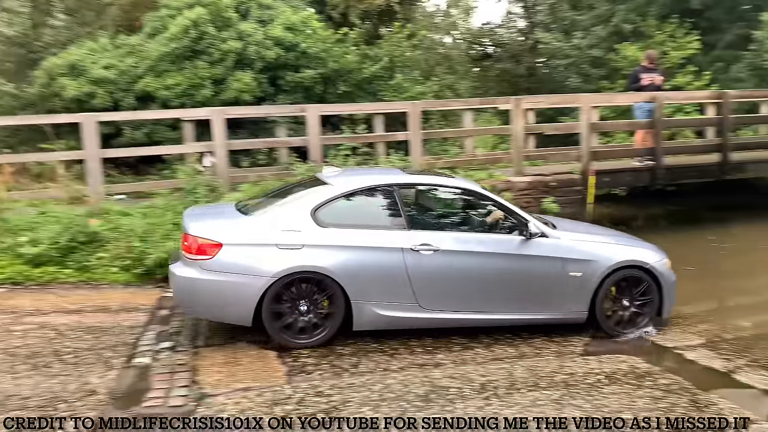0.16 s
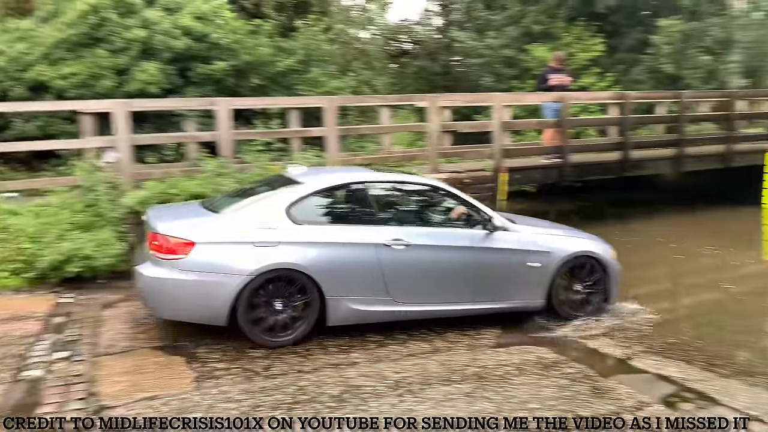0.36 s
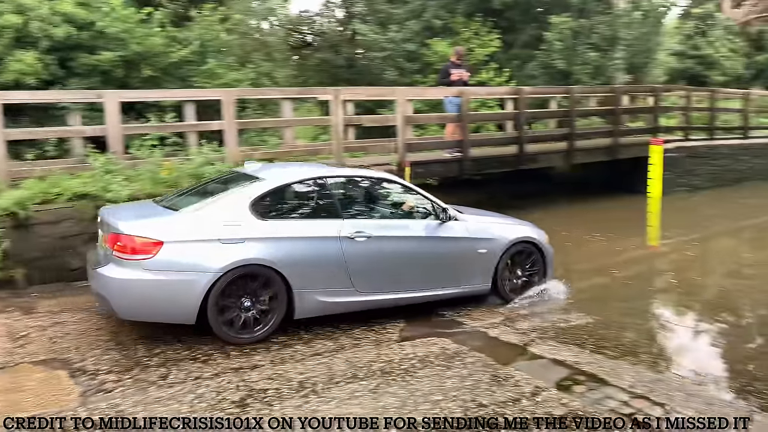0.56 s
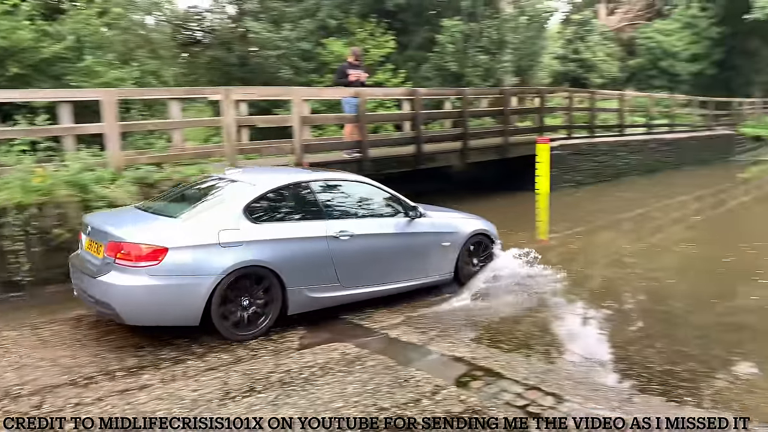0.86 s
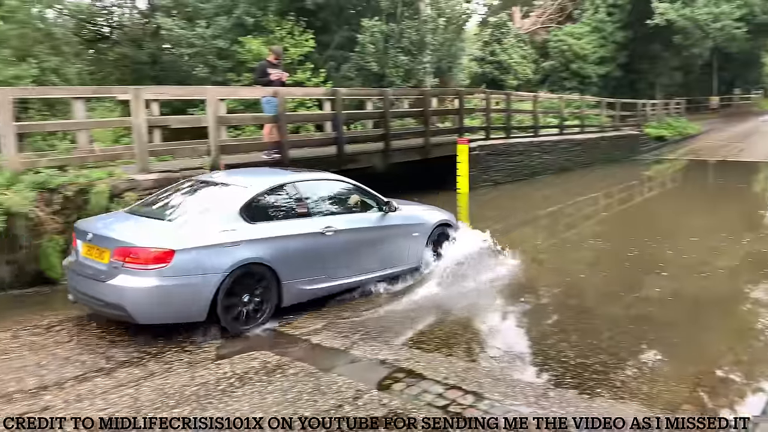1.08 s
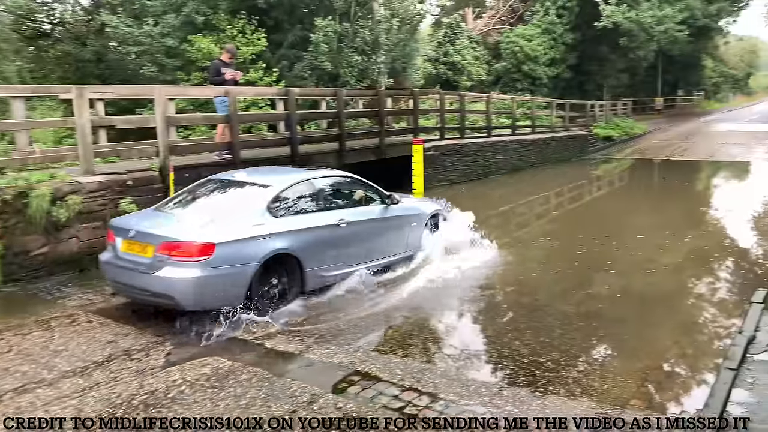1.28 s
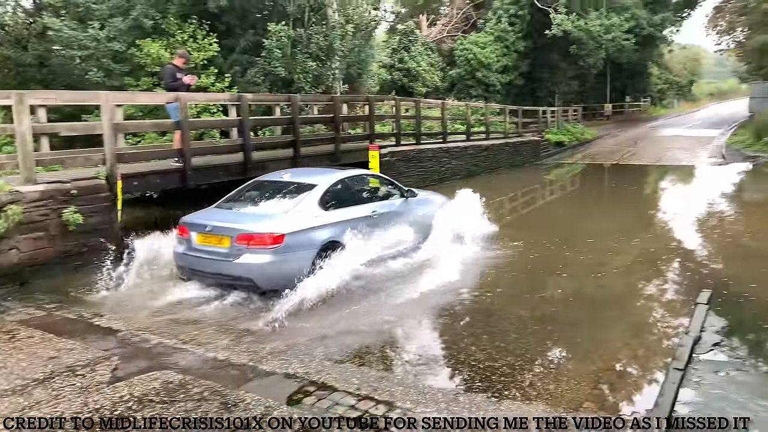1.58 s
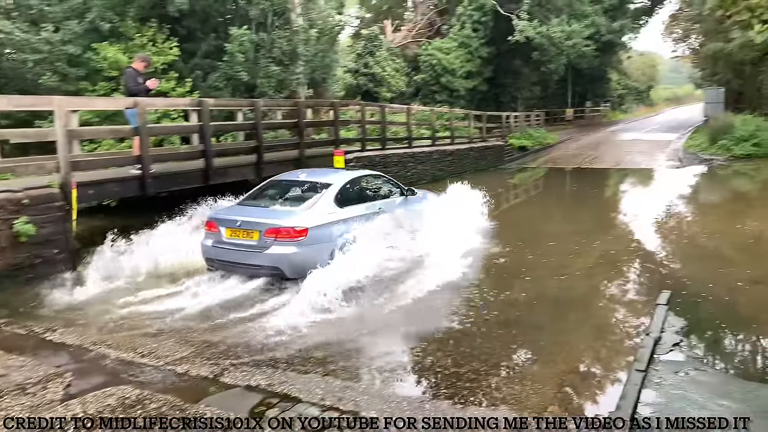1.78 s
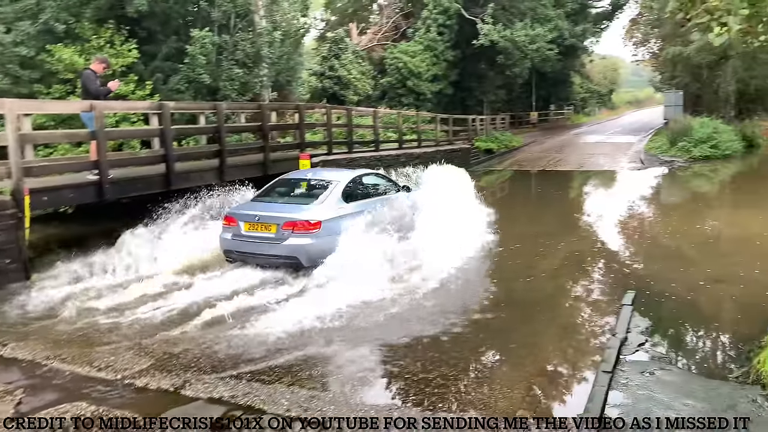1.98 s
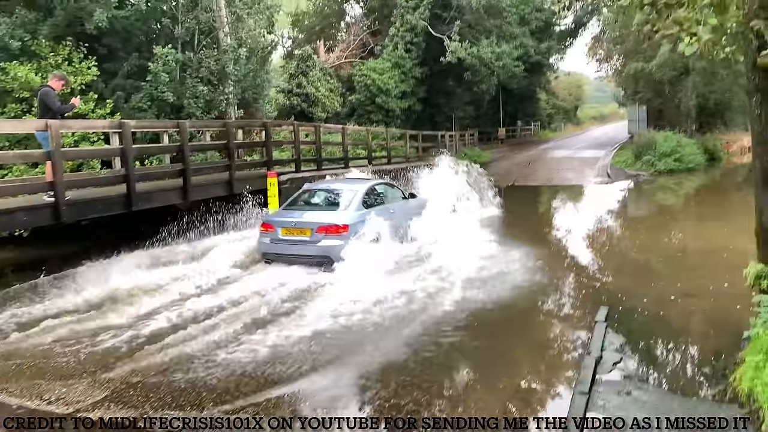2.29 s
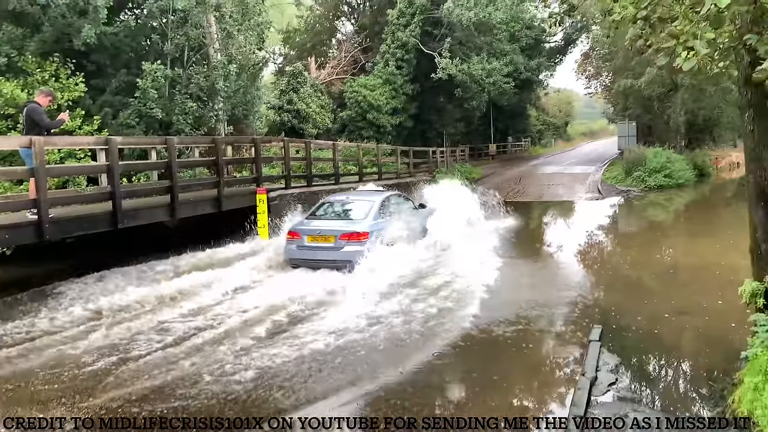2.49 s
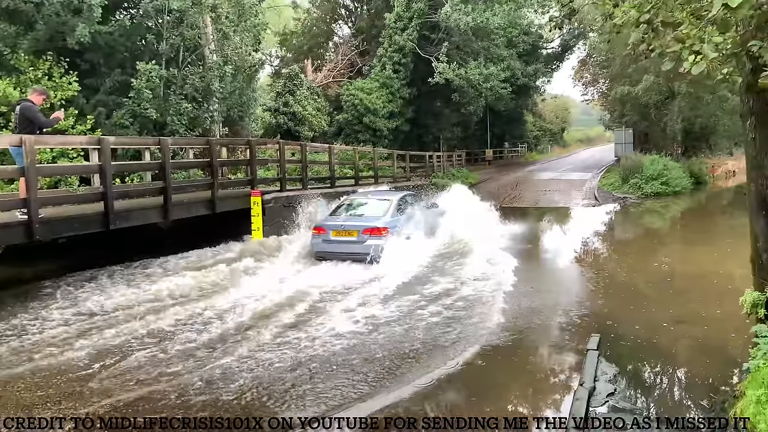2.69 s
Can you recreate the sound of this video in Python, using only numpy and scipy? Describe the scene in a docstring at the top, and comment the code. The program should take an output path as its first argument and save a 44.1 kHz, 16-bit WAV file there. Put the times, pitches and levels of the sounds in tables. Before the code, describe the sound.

A car rolls over wet stones with sharp tyre clacks and small puddle slaps, then drives into a flooded ford; sloshing swells into roaring spray, low booms and gulps, heard outdoors in stereo from the bank.

```python
"""Tyres clack over stones and slap through puddles above an engine's low burble.
Then a car ploughs from a wet ramp into a flooded ford: the bow wave sloshes, rumbles and hisses with spray.
Water is built from patchy noise and rising bubble tones, the underbody from thuds, gulps and a churning boom;
the tyres ring a wet wheel arch, and the engine is a stack of wavering orders of its firing rate."""
import sys
import numpy as np
from scipy import signal
from scipy.fft import rfft, irfft, next_fast_len
from scipy.io import wavfile
from scipy.ndimage import uniform_filter1d, map_coordinates

SR = 44100
rng = np.random.default_rng(int(sys.argv[2]) if len(sys.argv) > 2 else 0)


def int16_out(signal):
    """Quantize to a 16-bit WAV file."""
    q = np.round(np.clip(np.atleast_2d(signal).T, -1, 1) * 32767)
    wavfile.write(sys.argv[1], SR, q.astype(np.int16))


N = 125685  # samples, 2.85 s
FULL_FLOW_DB = -31.5  # slosh level at which rumble and splatter have their nominal levels


def amp(db):
    """Decibels to gain."""
    return 10 ** (np.asarray(db) / 20)


def unit(x):
    """Scale to rms 1."""
    return x / np.sqrt(np.mean(x ** 2) + 1e-20)


def centred(x):
    """Put a mono sound in the shared half of a (shared, diffuse) pair."""
    return np.array([x, np.zeros(N)])


def along(points, hz):
    """Read (f/Hz, value) points on a log frequency axis."""
    f, v = np.transpose(points)
    return np.interp(np.log(hz + 1), np.log(f + 1), v)


def curves(rows):
    """One value per sample for each column after the time."""
    s, *cols = np.transpose(rows)
    return [np.interp(np.arange(N) / SR, s, c) for c in cols]


def wobble(rate):
    """A smooth random curve, rate knots a second."""
    knots = rng.standard_normal(2048)
    return map_coordinates(knots, [np.arange(N) * rate / SR], mode="wrap")


def filtered(x, response):
    """Multiply the spectrum of x by a response of frequency."""
    m = next_fast_len(N + SR // 2)
    return irfft(rfft(x, m) * response(np.fft.rfftfreq(m, 1 / SR)), m)[..., :N]


def coloured(x, spectrum):
    """Shape x with a (f/Hz, level/dB) colour, at rms 1."""
    return unit(filtered(x, lambda hz: amp(along(spectrum, hz))))


def band(f, hz, q):
    """One resonance at hz, of sharpness q."""
    return 1j * f * hz / (q * (hz * hz - f * f) + 1j * f * hz)


def rush(patchy_db):
    """Two white noises sharing random gain patches in time and frequency, like ragged running water."""
    z = signal.stft(rng.standard_normal((2, N)), nperseg=512)[2]
    field = rng.standard_normal(z.shape[1:])
    field = uniform_filter1d(field, size=7, axis=0)
    field = uniform_filter1d(field, size=8, axis=1)
    return unit(signal.istft(z * amp(patchy_db * unit(field)), nperseg=512)[1][:, :N])


def bubbles(per_s, centre_hz, spread, cycles, scatter_db, rise, size):
    """A stream of short damped tones of random pitch and strength, each gliding upward."""
    when, pitch, strength = rng.random((int(per_s * N / SR), 3)).T
    start = (when * N).astype(int)
    detune = np.exp(spread * np.log((pitch + .01) / (1.01 - pitch)) / 2)
    hz = np.broadcast_to(centre_hz, N)[start] * detune
    turns = np.minimum(hz, SR / 3)[:, None] * np.arange(size) / SR
    age = np.minimum(turns / cycles, 2)  # 1 where the tone has died by 60 dB
    decay = np.exp(-np.log(1000) * age)
    onset = 1 - np.exp(-2 * turns)
    tones = np.sin(2 * np.pi * turns * (1 + rise * age / 2)) * decay * onset
    gain = amp(-scatter_db * np.log(strength + .01)) * np.sqrt(hz)
    places = start[:, None] + np.arange(size)
    return unit(np.bincount(places.ravel(), (tones * gain[:, None]).ravel(), N + size)[:N])


def bubble_pair(*args, **kwargs):
    """Two independent bubble streams, for width."""
    return np.array([bubbles(*args, **kwargs) for _ in range(2)])


# Bow wave [t/s, slosh level/dB before the mix trim, spray level/dB]
BOW_WAVE = [(0, -37, -50), (.16, -39, -44.5), (.33, -43, -48.5), (.5, -41, -42.5), (.68, -37, -42.5),
            (.85, -35.5, -41), (1.05, -30.5, -36.5), (1.15, -29.5, -32.5), (1.3, -31.5, -31),
            (1.45, -28, -30), (1.56, -28, -32), (1.78, -30.5, -33), (2.05, -29, -30), (2.3, -29.5, -29.5),
            (2.55, -32, -32), (2.85, -32, -33.5)]
# Colour of the slosh [f/Hz, level/dB]
SLOSH_COLOUR = [(60, -26), (200, -26), (400, 5), (700, 2), (1050, 2.5), (1450, 0.5), (1750, -2), (2400, -3),
                (3200, -7.5), (6000, -47)]
# Colour of the low rumble [f/Hz, level/dB]
RUMBLE_COLOUR = [(20, -26), (35, -12), (50, 1), (70, -5.5), (120, -6), (250, -7.5), (600, -32.5)]
RUMBLE_DB, RUMBLE_FOLLOWS = -30.5, 0.77  # level at full flow; dB gained per dB of slosh


def bow_wave():
    """The pushed water rumbles and sloshes as patchy noise; trapped bubbles gurgle in it."""
    db, _ = curves(BOW_WAVE)
    gurgle = bubble_pair(1300, 1099.5, spread=0.42, cycles=27, scatter_db=0, rise=0.44, size=1400)
    slosh = unit(coloured(rush(patchy_db=1.5), SLOSH_COLOUR) + gurgle)
    rumble_db = RUMBLE_DB + RUMBLE_FOLLOWS * (db - FULL_FLOW_DB)
    rumble = amp(rumble_db) * coloured(rush(patchy_db=0.5), RUMBLE_COLOUR)
    return amp(db - 1.5 + 0.41 * wobble(35.3)) * slosh + rumble  # slosh trimmed 1.5 dB


# Colour of the spray, also of the tyres' squirts [f/Hz, level/dB]
SPRAY_COLOUR = [(600, -9), (1500, -12), (2300, 3.5), (3100, -2.5), (4100, 1.5), (5300, -4), (6200, -.5),
                (6900, -2.5), (7800, -2.5), (8150, 5), (9000, -0.5), (10500, 0.5), (11800, -6.5),
                (13200, 0.5), (14700, -20.5)]
MIST_HZ = 7100  # the mist is the hiss above this
MIST_REFERENCE_DB = -23.5  # spray level at which mist would be unchanged; softer spray has less mist
SPRAY_BRIGHTENS = 0.035  # extra dB of mist per dB of spray


def spray():
    """Sheets of water tear into hiss and rain back as droplets; the harder the throw, the more fine mist."""
    _, db = curves(BOW_WAVE)
    drops = bubble_pair(2200, 5470, spread=0.61, cycles=3.9, scatter_db=-2.5, rise=.1, size=160)
    hiss = coloured(rush(patchy_db=1.5) + amp(-6) * drops, SPRAY_COLOUR)
    mist = filtered(hiss, lambda hz: hz ** 4 / (hz ** 4 + MIST_HZ ** 4))
    mist_gain = amp(SPRAY_BRIGHTENS * (db - MIST_REFERENCE_DB))
    return amp(db + 0.7 * wobble(45.1)) * (hiss - mist + mist_gain * mist)


# Waves thudding against the underbody [t/s, level/dB before attack and decay, f/Hz]
UNDERBODY_THUDS = [(.295, -29.5, 71), (.72, -25, 57.4), (1.115, -22, 80), (1.53, -17.5, 72.2),
                   (1.745, -20, 74), (1.92, -17, 67.06), (2.313, -13, 68), (2.375, -7, 86.3),
                   (2.533, -15, 72.93), (2.699, -13, 88.9), (2.82, -16.5, 78)]
THUD_ATTACK_S, THUD_DECAY_S = 0.0036, 0.014


def thuds():
    """Each wave gives the floor pan a soft, quickly damped blow: a low sine with a rounded onset."""
    t, out = np.arange(N) / SR, np.zeros(N)
    for s, db, hz in UNDERBODY_THUDS:
        age = np.maximum(t - s, 0)
        shape = (1 - np.exp(-age / THUD_ATTACK_S)) * np.exp(-age / THUD_DECAY_S)
        out += amp(db) * np.sqrt(2) * np.sin(2 * np.pi * hz * age) * shape
    return centred(out)


# Water churning under the body [t/s, level/dB before the mix trim, air pocket f/Hz]
UNDERBODY_CHURN = [(0, -45.5, 150), (.35, -36.5, 156), (.65, -47, 185), (.82, -33, 178.2), (1.03, -44, 188),
                   (1.15, -25.5, 193.6), (1.36, -33.5, 213), (1.6, -24.5, 174), (1.95, -27.5, 162),
                   (2.2, -25, 155), (2.33, -21.5, 150), (2.42, -22, 104), (2.6, -21.5, 102),
                   (2.85, -27.5, 92.2)]


def churn():
    """Big air pockets boom under the car as dense, short low tones that follow a moving pitch."""
    db, hz = curves(UNDERBODY_CHURN)
    boom = bubble_pair(560, hz, spread=0.35, cycles=6.6, scatter_db=0.0, rise=0.04, size=3000)
    return amp(db - 1.0) * boom  # trimmed 1 dB


# The largest air pockets gulping under the car [t/s, peak level/dB, starting f/Hz]
AIR_GULPS = [(1.10, -29, 159.3), (1.165, -26.5, 234.6), (1.499, -28.5, 194.5), (1.595, -25.5, 237),
             (1.675, -27, 175), (2.066, -26, 165), (2.12, -19.5, 135), (2.195, -27, 169), (2.285, -20, 127),
             (2.305, -20, 180), (2.535, -26.5, 224)]
GULP_SWELL_S, GULP_RISE_PER_S = 0.015, 0.85  # time to peak; fraction of the pitch gained per second


def gulps():
    """A big pocket swells, rings and rises in pitch as it nears the surface."""
    t, out = np.arange(N) / SR, np.zeros(N)
    for s, db, hz in AIR_GULPS:
        age = np.maximum(t - s, 0)
        shape = age / GULP_SWELL_S * np.exp(1 - age / GULP_SWELL_S)
        turns = hz * age * (1 + GULP_RISE_PER_S * age / 2)
        out += amp(db) * shape * np.sin(2 * np.pi * (turns + rng.random()))
    return centred(out)


# Heavy water falling back [t/s, level/dB]
WASH_LEVEL = [(0, -38), (.55, -56), (.85, -38.5), (1.02, -43), (1.16, -34), (1.35, -41), (1.6, -30.5),
              (1.9, -32), (2.15, -33), (2.36, -29), (2.6, -33.5), (2.85, -33)]
# Its hollow colour [f/Hz, level/dB]
WASH_TONE = [(100, -4), (220, -3.5), (330, 0.5), (450, -3.5), (620, -2), (900, -6), (1600, -26),
             (4000, -47)]


def wash():
    """Thrown water lands in a hollow roar of low noise and plopping bubbles."""
    db, = curves(WASH_LEVEL)
    plops = bubble_pair(500, 456.7, spread=0.405, cycles=20.2, scatter_db=1.5, rise=0.2, size=2000)
    return amp(db) * coloured(rush(patchy_db=2.0) + amp(-6.5) * plops, WASH_TONE)


SPLATTER_PER_S, SPLATTER_DECAY_S = 60, .013
SPLATTER_DB, PLINK_DB = -7, -12.5  # against the slosh curve at full flow
SPLATTER_FOLLOWS = 0.25  # extra dB per dB of slosh


def splatter():
    """Clumps of thrown water land as noise bursts, each with its own colour; single drops plink among them."""
    db, _ = curves(BOW_WAVE)
    size = 4096
    t, out = np.arange(size) / SR, np.zeros((2, N + size))
    f = np.fft.rfftfreq(size, 1 / SR)
    for when, tone, strength in rng.random((int(SPLATTER_PER_S * N / SR), 3)):
        burst = rng.standard_normal((2, size)) * np.exp(-t / SPLATTER_DECAY_S)
        hz = 480 * 6 ** tone
        clump = unit(irfft(rfft(burst) * band(f, hz, 4.2) ** 2))
        start = int(when * N)
        out[:, start:start + size] += amp(9.2 * strength - 6.5 * tone) * clump  # brighter is softer
    plinks = bubble_pair(90, 1597, spread=0.44, cycles=99, scatter_db=2.0, rise=0.17, size=3000)
    mix = amp(SPLATTER_DB) * unit(out[:, :N]) + amp(PLINK_DB) * plinks
    return amp(db + SPLATTER_FOLLOWS * (db - FULL_FLOW_DB)) * mix


# Ring of the wet wheel arch [f/Hz, width/Hz, level/dB]
ARCH_RING = [(590, 220, -11), (820, 150, 1), (1250, 104, -2), (1770, 40, 7.5), (2230, 68, 0),
             (2840, 330, -7), (4260, 160, -24)]


def hollow(f):
    """The wet wheel arch as a bank of resonances of alternating sign."""
    total = 0
    for k, (centre, width, db) in enumerate(ARCH_RING):
        total = total + (-1) ** k * amp(db) * 1j * f * width / (centre * centre - f * f + 1j * f * width)
    return total


# Tyres clacking over the ramp's stones [t/s, peak level/dB, contact brightness f/Hz, ring pitch ratio]
STONE_CLACKS = [(.1285, -32, 2300, 1.25), (0.131, -18.5, 2570, 1.22), (.136, -22, 1150, 1.34),
                (.184, -27, 1500, 1), (0.2187, -21.5, 980, 1.14), (.4305, -20, 1800, 1),
                (0.436, -22, 1230, 1.04), (0.436, -17, 850, 1.007), (.4395, -23, 1900, 1),
                (.533, -23, 1050, 1.1)]
CLACK_Q, CLACK_SNAP = .8, .2  # contact sharpness; share of pulse that bypasses the ring
CLACK_ECHO_DB, CLACK_ECHO_S = -7.5, 0.01  # level against the clack; decay time


def clacks():
    """Each hard contact is one sharp pulse that rings the wheel arch; the bridge scatters a short echo."""
    out, t = np.zeros(N), np.arange(SR // 8) / SR
    for s, db, hz, pitch in STONE_CLACKS:
        contact = signal.unit_impulse(N, round(s * SR))
        pulse = filtered(contact, lambda f: band(f, hz, CLACK_Q) ** 2 * (CLACK_SNAP + hollow(f / pitch)))
        out += amp(db) * pulse / abs(pulse).max()
    tail = rng.standard_normal((2, len(t))) * np.exp(-t / CLACK_ECHO_S)
    tail /= np.linalg.norm(tail[0])
    echo = signal.fftconvolve(out[None], tail, axes=1)[:, :N]
    return centred(out) + amp(CLACK_ECHO_DB) * echo


# Tyres slapping the water [t/s, level/dB, length/s, squirt hiss level/dB against the slap, ring pitch ratio]
TYRE_SLAPS = [(0.126, -34, 0.012, -10, 1.4), (0.433, -35, 0.006, 0.5, 1.02),
              (0.53, -36.5, 0.008, -13, 1.09), (0.821, -35, 0.015, -18, 0.94),
              (1.108, -29, 0.018, -4, 0.85), (1.181, -31, 0.0048, -16, 1.04),
              (1.419, -27, 0.0064, -9, 0.83), (2.166, -30, 0.011, -10, 1.2)]
SLAP_ATTACK_S, SLAP_DECAY_S, SQUIRT_DECAY_S = .005, .0045, .012
SLAP_GRIT_DB = 3  # depth of the rapid level flutter


def slaps():
    """A tyre squeezes out water: a short, gritty, hollow burst, and a squirt of hiss that lingers."""
    t, out = np.arange(N) / SR, np.zeros((2, N))
    grit = unit(rng.standard_normal((2, N)) * amp(SLAP_GRIT_DB * wobble(700)))
    hiss = coloured(rng.standard_normal((2, N)), SPRAY_COLOUR)
    for s, db, length, hiss_db, pitch in TYRE_SLAPS:
        rise = np.clip((t - s) / SLAP_ATTACK_S + 1, 0, 1)  # full at s
        after = np.maximum(t - s - length, 0)
        shape = rise * np.exp(-after / SLAP_DECAY_S)
        body = filtered(shape * grit, lambda f: hollow(f / pitch))
        body *= shape.std() / body.std(axis=1, keepdims=True)
        squirt = amp(hiss_db) * rise * np.exp(-after / SQUIRT_DECAY_S) * hiss
        out += amp(db) * (body + squirt)
    return out


# Tyres parting the shallows [t/s, level/dB]
SWISH_LEVEL = [(0, -56), (.3, -50.5), (.48, -40), (.7, -39.5), (1.0, -36.5), (1.25, -41), (1.6, -40.5),
               (2.85, -59)]
# Colour of the parted water [f/Hz, level/dB]
SWISH_TONE = [(500, -31), (1100, 2.5), (1800, 2), (2700, -1.5), (4200, 1.5), (5200, -2.5), (9000, -5.5),
              (14000, -30)]


def swish():
    """The front tyres slice the shallows into a crackling sheet: very patchy noise and brief bubbles."""
    db, = curves(SWISH_LEVEL)
    crackle = bubble_pair(1200, 2580, spread=0.41, cycles=5.3, scatter_db=2.0, rise=0.27, size=400)
    flutter_db = 1.3 * wobble(40)
    return amp(db + flutter_db) * coloured(rush(patchy_db=7.5) + amp(-2) * crackle, SWISH_TONE)


# Engine [t/s, firing rate f/Hz, level/dB]
ENGINE_RUN = [(0, 79.8, -43), (.15, 72.55, -38), (.3, 79.8, -45.5), (.48, 96.3, -35.5), (.62, 96.4, -41),
              (.8, 84, -37), (1.05, 87, -33.5), (1.3, 91.1, -36), (1.65, 108, -29), (1.95, 110.6, -33),
              (2.08, 88.4, -29.5), (2.28, 89.1, -30.5), (2.39, 88.45, -25), (2.46, 93.9, -24),
              (2.54, 102.8, -23), (2.61, 96.2, -26), (2.69, 90.46, -25.5), (2.77, 97.6, -33),
              (2.85, 112.7, -23.5)]
# Exhaust orders [multiple of the firing rate, level/dB before the tailpipe resonance]
EXHAUST_ORDERS = [(.5, -2), (1, 0.5), (1.5, -1), (2, -7), (2.5, -9), (3, -15.5)]
ENGINE_ROUGH, ENGINE_JITTER = .7, .045  # wobble of each order's strength; of the firing rate
CAVITY_Q = 1.04  # sharpness of the air pocket around the tailpipe


def engine():
    """Wavering orders of the firing rate; the tailpipe's air pocket favours those near the churn's pitch."""
    hz, db = curves(ENGINE_RUN)
    _, cavity_hz = curves(UNDERBODY_CHURN)
    phase = 2 * np.pi * np.cumsum(hz * (1 + ENGINE_JITTER * wobble(24.68))) / SR
    gains, orders = [], []
    for k, level in EXHAUST_ORDERS:
        gains.append(amp(level) * abs(band(k * hz, cavity_hz, CAVITY_Q)))
        roughness = 1 + ENGINE_ROUGH * wobble(30)
        orders.append(roughness * np.sin(k * phase + 2 * np.pi * rng.random()))
    gains, orders = np.array(gains), np.array(orders)
    # the resonance shifts the balance of the orders, not their summed power
    note = (gains * orders).sum(axis=0) / np.linalg.norm(gains, axis=0)
    return centred(amp(db) * unit(note))


# Likeness of the two channels [f/Hz, likeness 0-1]
CHANNEL_LIKENESS = [(100, .992), (200, .98), (380, .89), (700, .72), (1400, .65), (1900, .25), (4200, .3),
                    (6500, .16), (8000, .42), (11500, .77), (13200, .74), (14300, .35)]
# Phase by which left leads right [f/Hz, phase/rad]
LEFT_LEAD = [(400, 0), (1000, .5), (1400, 1), (2900, 2.2), (4200, .5), (7000, .3), (8000, -1.5),
             (9700, -5.8), (10600, -6.8), (11500, -9.2), (14300, -14.4)]
# Level of left over right [f/Hz, level/dB]
LEFT_TILT = [(60, -1.3), (250, -0.9), (1200, -1), (2400, 0.6), (4400, 0.74), (8100, -2.5), (14000, 0.7)]


def microphones(pair):
    """Shared and diffuse become left and right: alike in the bass, widest at 2-7 kHz, closer near 12 kHz."""
    def blend(hz):
        turn = np.arccos(np.clip(along(CHANNEL_LIKENESS, hz), 0, .995)) / 2
        return np.array([np.cos(turn), np.sin(turn)])

    half = np.array([[.5], [-.5]])  # each channel takes half of every difference

    def offset(hz):
        return amp(half * along(LEFT_TILT, hz)) * np.exp(1j * half * along(LEFT_LEAD, hz))

    shared, diffuse = filtered(pair, blend)
    return filtered(np.array([shared + diffuse, shared - diffuse]), offset)


def scene():
    """Car and water, heard from the bank."""
    water = bow_wave() + spray() + wash() + splatter()
    underbody = thuds() + churn() + gulps()
    tyres = clacks() + slaps() + swish()
    return microphones(water + underbody + tyres + engine())


LOW_CUT_HZ, TOP_HZ = 56, 14750


def record(dry):
    """The recorder cuts the deep bass and keeps nothing above its band limit."""
    return filtered(dry, lambda hz: (hz < TOP_HZ) * hz ** 3 / np.sqrt(hz ** 6 + LOW_CUT_HZ ** 6))


dry = scene()
out = record(dry)
int16_out(out)
```